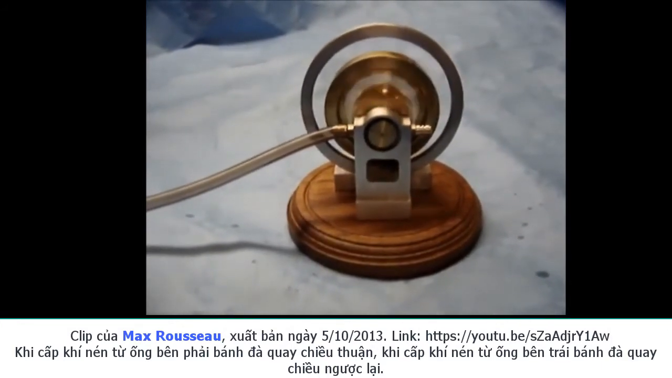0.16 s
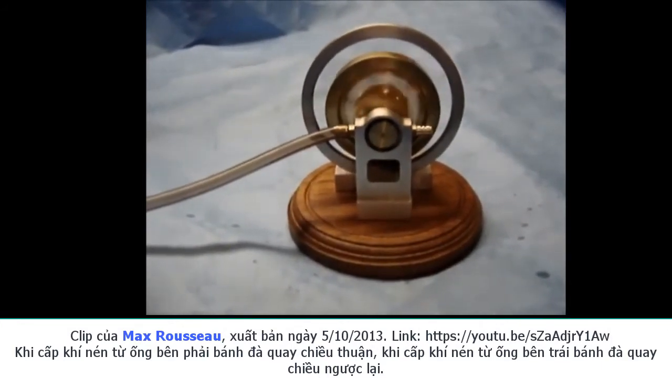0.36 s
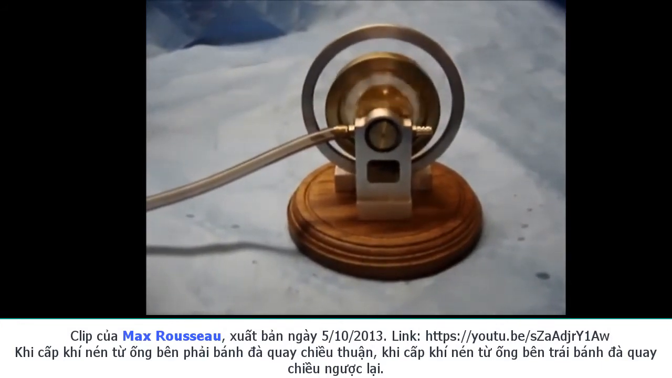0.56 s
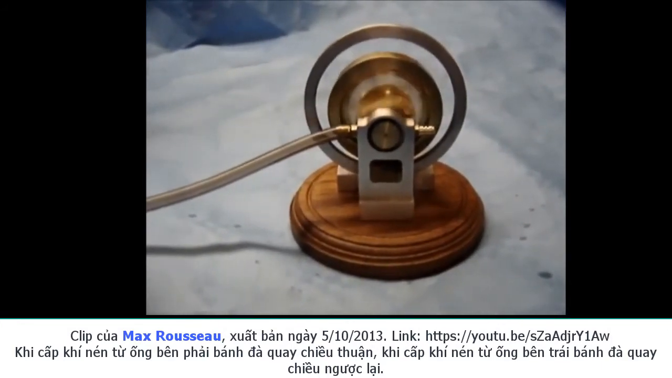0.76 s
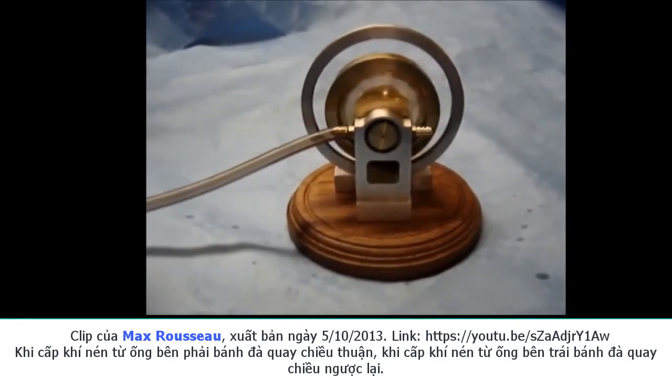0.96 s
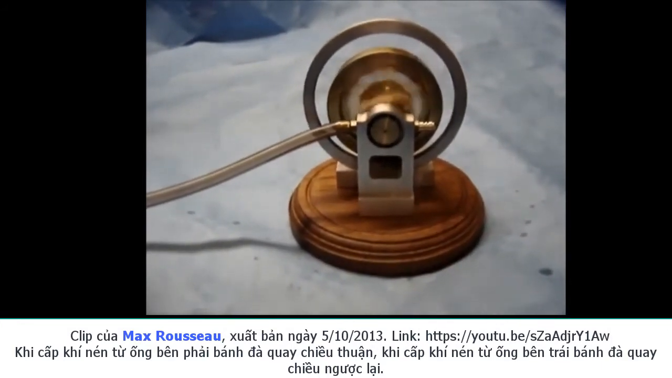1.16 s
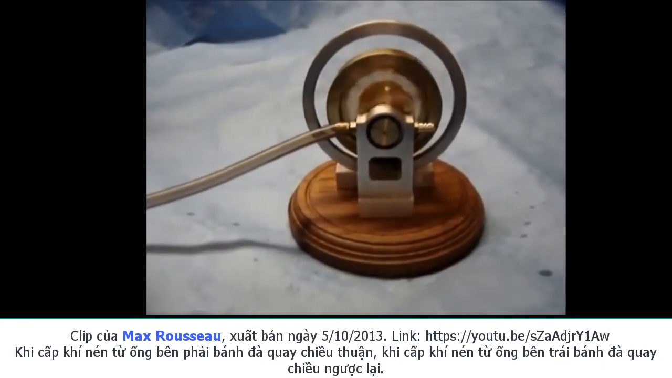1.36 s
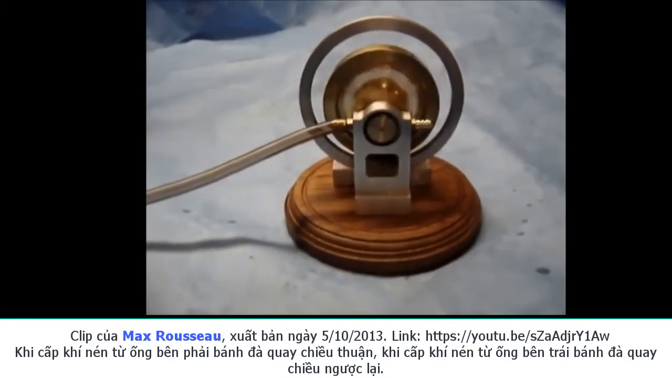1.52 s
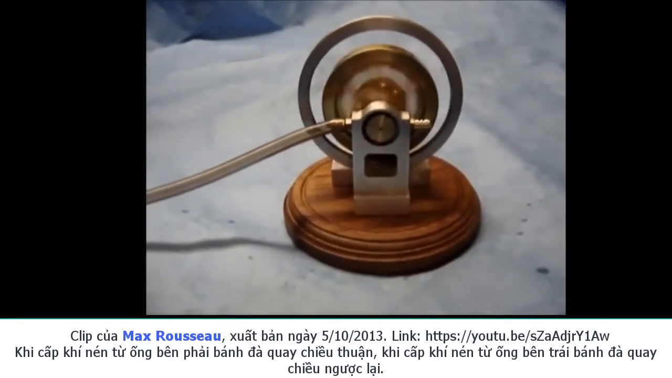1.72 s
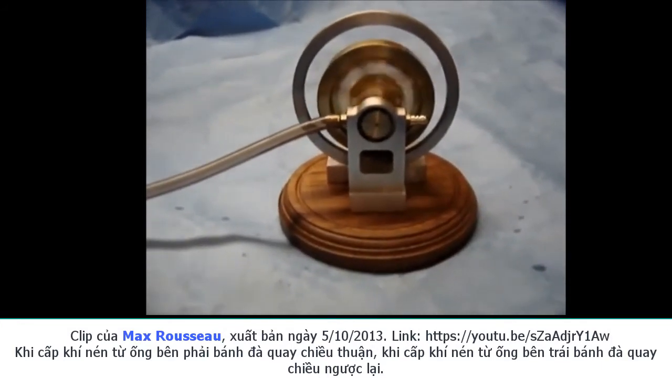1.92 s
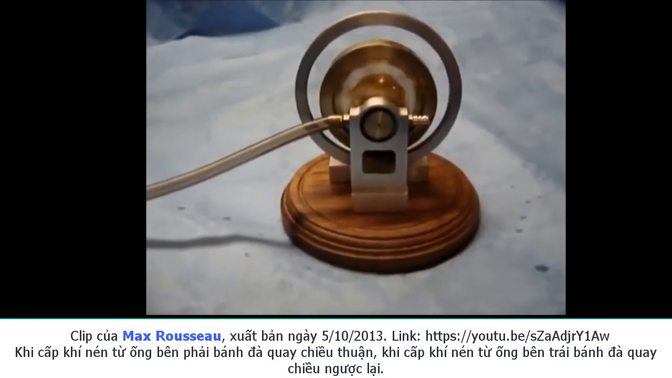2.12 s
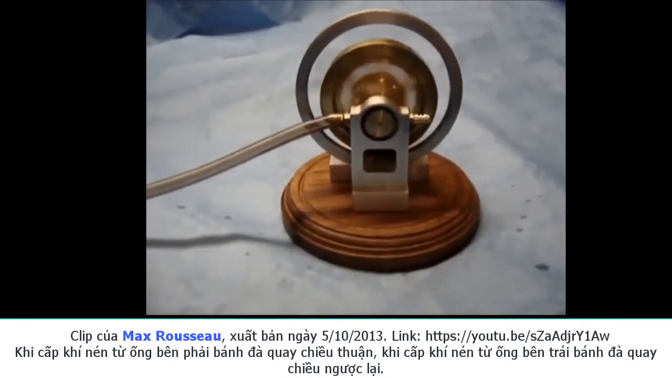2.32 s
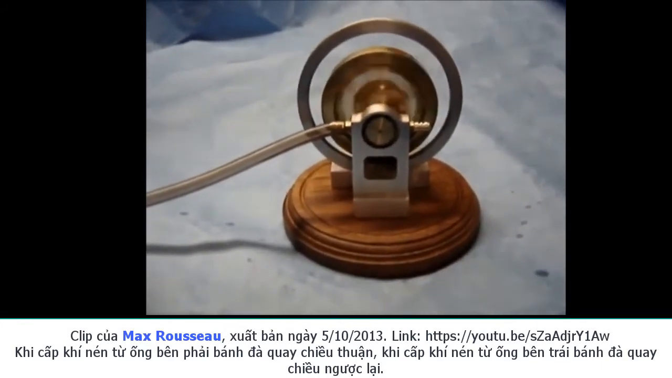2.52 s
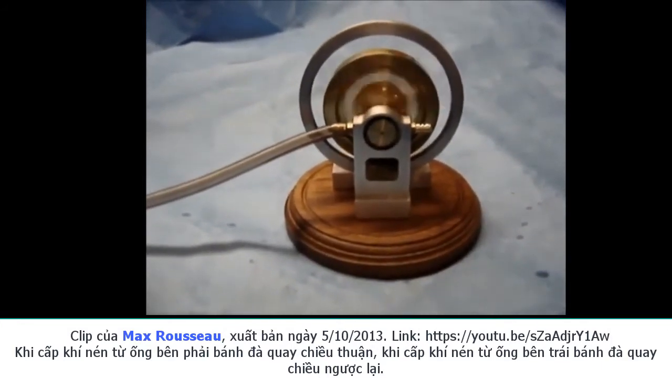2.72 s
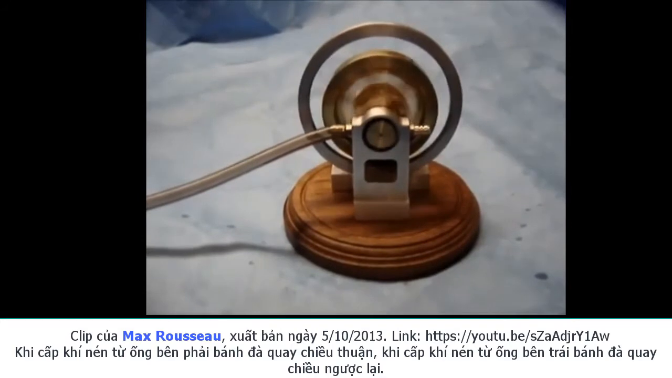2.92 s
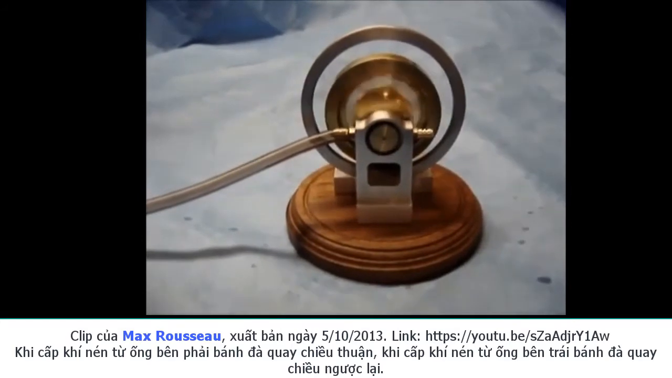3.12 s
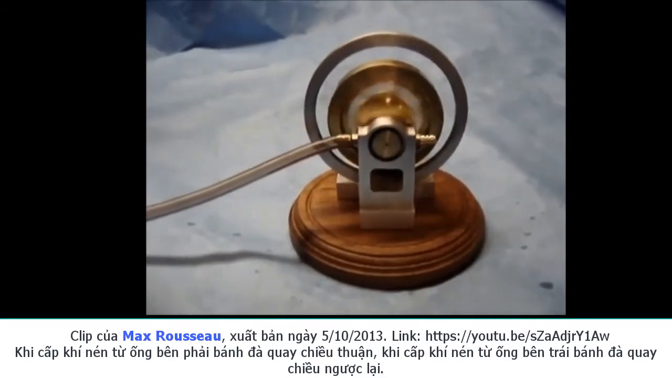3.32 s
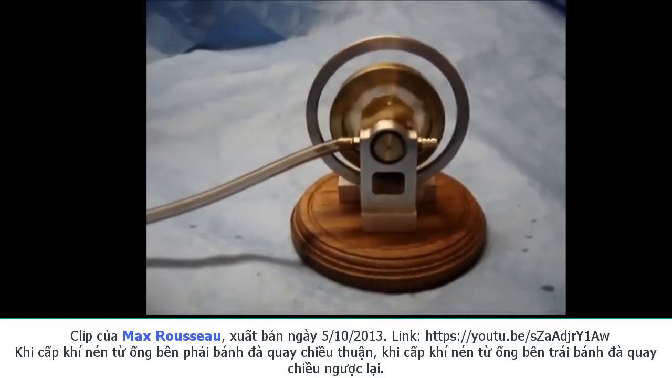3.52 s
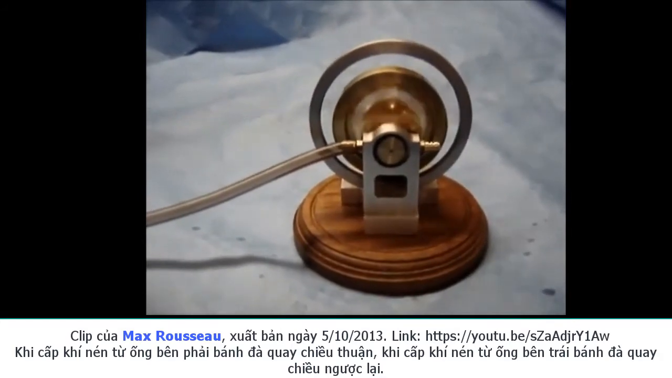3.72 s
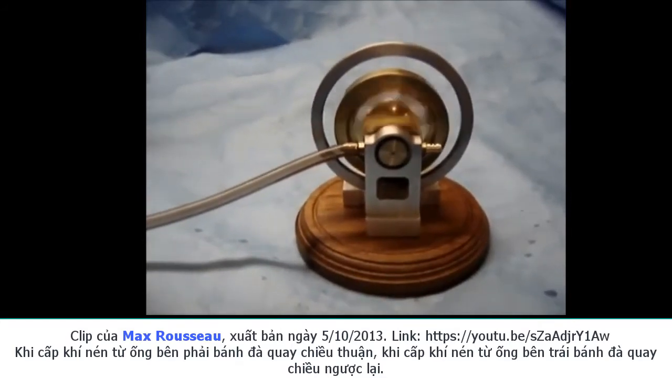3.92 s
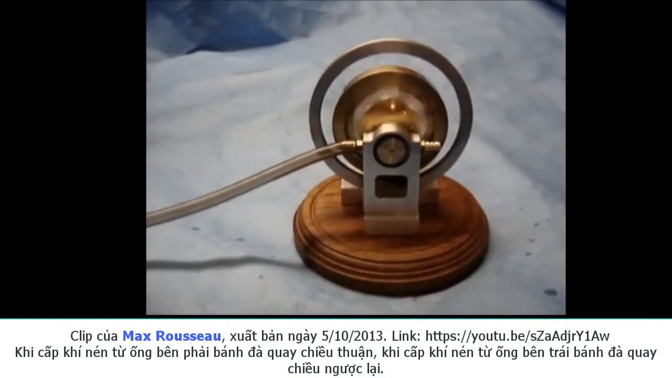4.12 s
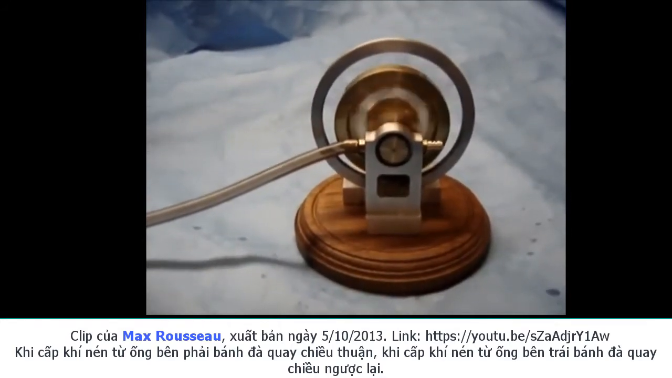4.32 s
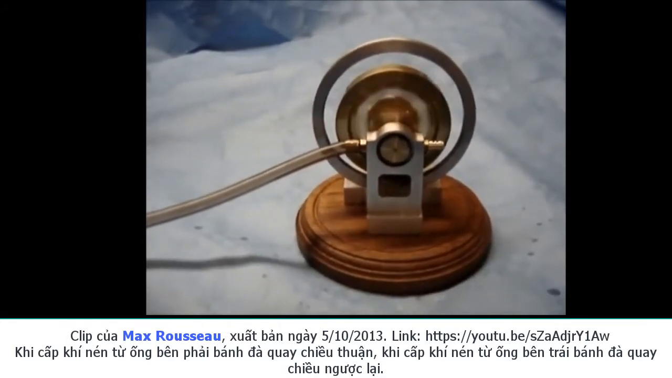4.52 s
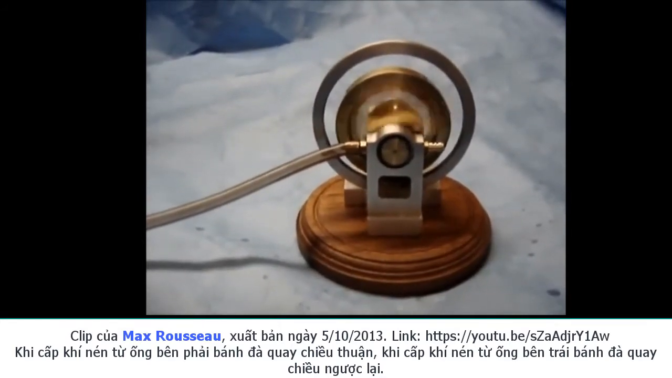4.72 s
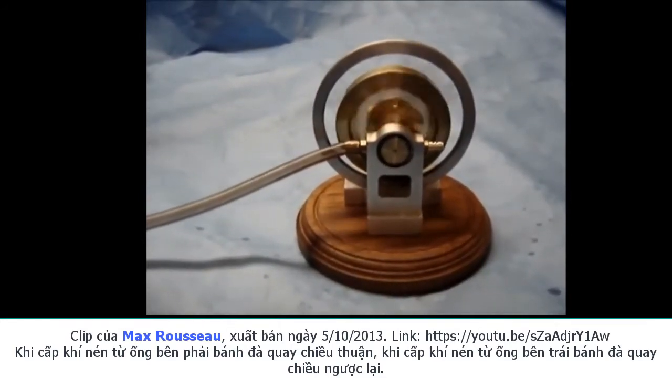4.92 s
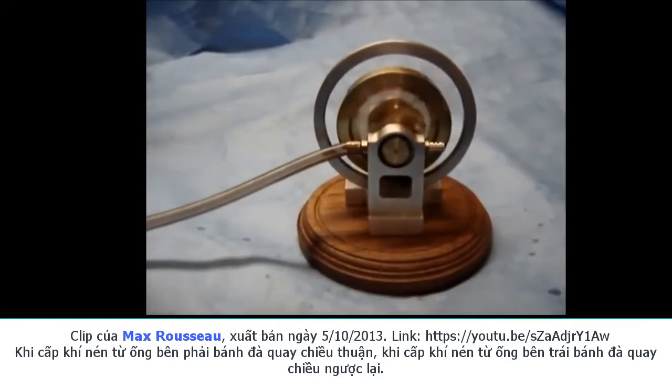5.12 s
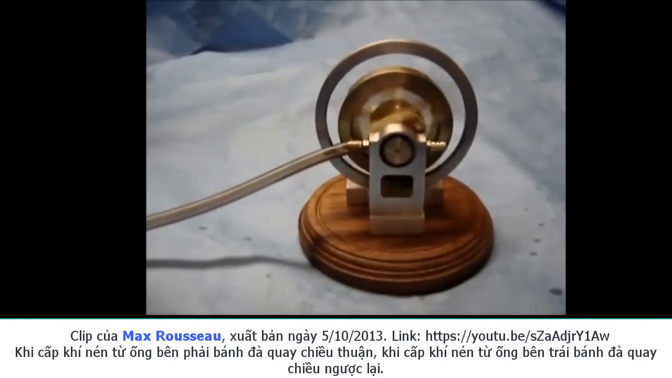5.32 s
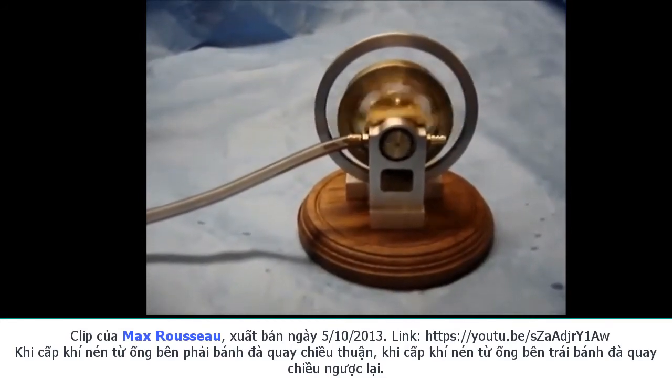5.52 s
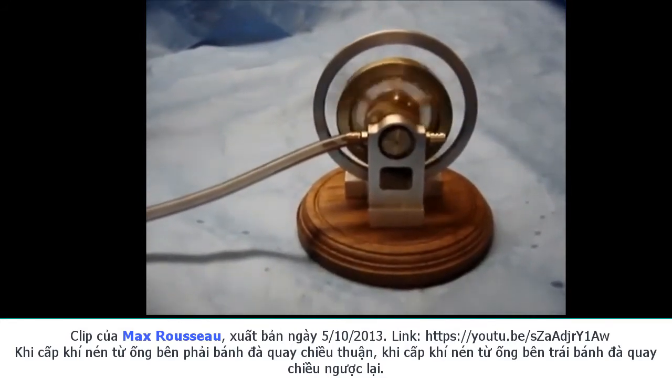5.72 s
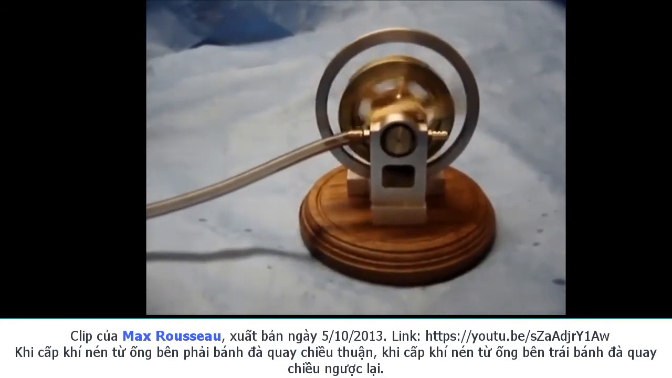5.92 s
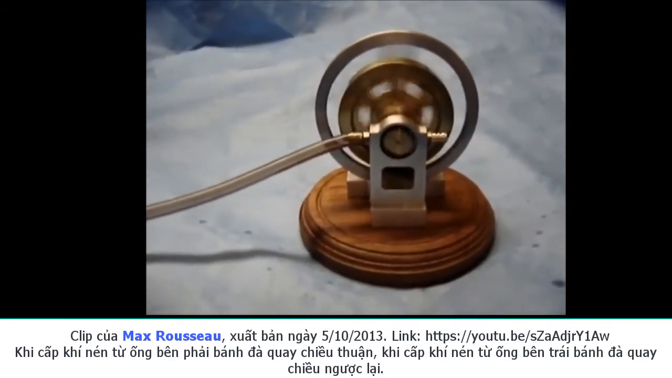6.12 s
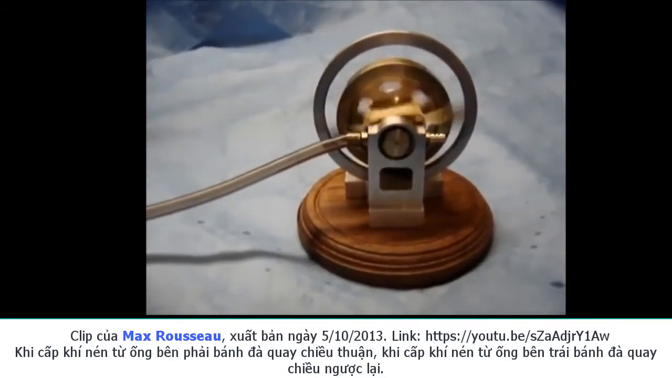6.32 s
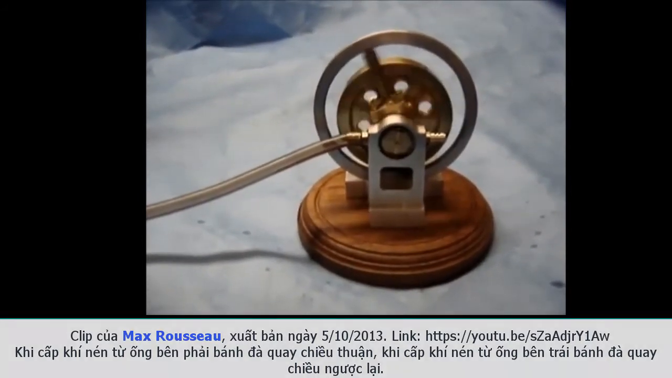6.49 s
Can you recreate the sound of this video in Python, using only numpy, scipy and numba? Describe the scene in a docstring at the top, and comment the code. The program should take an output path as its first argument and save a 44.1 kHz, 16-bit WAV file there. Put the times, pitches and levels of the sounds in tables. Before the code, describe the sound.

Fast, hissing exhaust beats and brassy chatter from a tiny air-driven engine hold steady, then wind down to slow, distinct clacking chuffs.

```python
"""Compressed-air brass engine slowing down

A small brass engine on a wooden base runs at speed, then slows to a creep as the air supply is turned down.
Twice a turn a port chops a noise jet into hiss; impulses at dead centre and along the turn ring the brass
parts as knocks and rattle. Multiples of the stroke rate through the base's resonances make the hum.
Dull handling bumps and room background lie beneath; a hand-held mono microphone is close by in a small room.
"""
import sys
import numpy as np
from scipy import signal
from scipy.fft import rfft, irfft
from scipy.io import wavfile
from numba import njit

SR = 44100
rng = np.random.default_rng(int(sys.argv[2]) if len(sys.argv) > 2 else 0)


def master(y):
    """Save y as 16-bit WAV."""
    cut = np.clip(np.atleast_2d(y).T, -1, 1)
    pcm = np.round(cut * 32767)  # scale
    wavfile.write(sys.argv[1], SR, pcm.astype(np.int16))


N = 293554
TIME = np.arange(N) / SR
FULL_RATE = 42  # full speed [strokes/s]; two strokes make a turn

# Dead-centre knocks slow enough to be heard singly:
# (time [s], relative level [dB], relative level of bright tick [dB], body resonance [Hz])
KNOCKS = [(4.6519, -3.5, -17.5, 1990), (4.7189, -5.5, -21, 2790), (4.789, -4, -10.5, 2850),
          (4.8601, -6.5, -16, 1850), (4.9325, -11.5, -7.5, 1850), (5.0095, -6, -17, 1840),
          (5.0889, -8, -13, 1850), (5.1706, -7.5, -13, 1770), (5.256, -3, -16.5, 2860),
          (5.3447, -6, -12.5, 1860), (5.437, -5, -15, 2710), (5.5362, -3.5, -16.5, 2780),
          (5.6405, -3, -15.5, 2580), (5.7519, -6.5, -11.5, 1660), (5.8724, -1, -14, 2820),
          (6.0051, -2.5, -16, 2800), (6.1544, -2.5, -15.5, 1990), (6.3284, -4, -16, 2860),
          (6.542, -2.5, -22, 2560)]


def undb(db):
    """Decibels to gain."""
    return 10 ** (np.asarray(db) / 20)


def level(x, db):
    """Scale to an rms level."""
    return x * undb(db) / np.sqrt(np.mean(x ** 2))


def noise(points):
    """Unit-rms noise shaped by (frequency [Hz], level [dB]) points."""
    hz, db = np.transpose(points)
    log_hz = np.log(np.maximum(np.fft.rfftfreq(N, 1 / SR), 1))
    gain = undb(np.interp(log_hz, np.log(hz), db))
    shaped = irfft(rfft(rng.standard_normal(N)) * gain, N)
    return level(shaped, 0)


@njit
def svf(x, hz, width):
    """State-variable band-pass with a moving centre, gain 1 there."""
    y, band_state, low_state = np.empty(len(x)), 0., 0.
    for i in range(len(x)):
        g, damping = np.tan(np.pi * hz[i] / SR), width / hz[i]
        v = (band_state + g * (x[i] - low_state)) / (1 + g * (g + damping))
        band_state = 2 * v - band_state
        low_state = low_state + 2 * g * v
        y[i] = damping * v
    return y


def band(x, hz, width_hz):
    """One resonance, fixed or moving."""
    return svf(x, hz * np.ones(N), float(width_hz))


def clicks(times, db):
    """Single impulses at the given times and levels."""
    inside = (times >= 0) & (times < (N - 1) / SR)
    samples = (times[inside] * SR).astype(int)
    return np.bincount(samples, undb(db[inside]), N)


def chatter(blows, decay_s):
    """Short, dying grind of the loose surfaces after each blow: noise under a decaying envelope."""
    keep = np.exp(-2 / (decay_s * SR))
    power = signal.lfilter([1 - keep], [1, -keep], blows ** 2)
    return np.sqrt(power) * rng.standard_normal(N)


def near(stroke, place, length):
    """Bell peaking once a turn at the given place; all in strokes."""
    distance = (stroke - place + 1) % 2 - 1
    return np.exp(-(distance / length) ** 2)


def wander():
    """Unit-rms random drift, mostly below 60 Hz."""
    return noise([(3, 0), (20, 0), (60, -40), (200, -90)])


def sets_in(speed, rate, order=10):
    """Level [dB] of a sound that fades out steeply below a speed [strokes/s]."""
    return -20 * np.log10(1 + (rate / speed) ** order)


def ports(stroke, speed, blur_power=1.12, edge_power=2.3):
    """Jet level [dB] over a turn: each port chokes the air, then lets out a puff."""
    # Ports, each shut just before a dead centre: (place in turn [strokes], closing time [strokes],
    # speed-dependent depth at creep [dB], constant depth term [dB], puff at full speed [dB])
    port_cycle = [(.83, 0.18, 31.5, -1, 2.5), (1.885, 0.12, 40, -3, 0)]
    creep_rate = 9  # strokes/s
    opening, advance = 0.064, 0.11  # strokes; quick opening, earlier action at full speed
    puff_delay, puff_length = 0.13, 0.07  # strokes
    db, pace = 0, speed / FULL_RATE
    for place, closing, slow_db, fast_db, puff_db in port_cycle:
        since = (stroke - place + advance * pace ** 2 + 1) % 2 - 1
        edge = np.where(since < 0, closing, opening)
        shut = np.exp(-np.abs(since / edge) ** edge_power)
        # under full pressure the air has no time to stop between strokes
        depth_db = fast_db + slow_db * (creep_rate / speed) ** blur_power
        puff = puff_db * pace * near(since, puff_delay, puff_length)
        db = db - shut * depth_db + puff
    return db


def exhaust(stroke, speed, flutter_db=2.48, leak_db=-48, return_side_db=0.07):
    """Air jet chopped by the ports, over a faint steady leak."""
    # Jet colour when slow: (frequency [Hz], level [dB])
    slow_colour = [(88, -54), (150, -14.5), (405, -17.5), (567, -1), (868, 1), (1280, 0), (1670, 4),
                   (2650, 3), (3110, 2.5), (3460, 1.5), (4940, 3.5), (9190, 0.5), (10400, -3.5),
                   (13500, -65), (22000, -120)]
    # Jet colour at full speed: (frequency [Hz], level [dB])
    fast_colour = [(150, -27), (400, -8.5), (900, -4.5), (1400, -2.5), (1900, 2), (2700, 3.5), (3600, -1),
                   (5000, 1.5), (7000, 5.5), (8200, -8), (9500, 3.5), (10400, -13)]
    slow_air_db, pressure_db, pressure_power = -27.5, 4.5, 4.2  # pressure falls much faster than speed
    pace = np.clip(speed / FULL_RATE, 0, 1)
    jet = pace * noise(fast_colour) + np.sqrt(1 - pace ** 2) * noise(slow_colour)
    # at speed the return stroke blows slightly harder than the outward one
    side_db = return_side_db * pace * np.sin(np.pi * stroke)
    air_db = slow_air_db + pressure_db * pace ** pressure_power - side_db
    flutter = noise([(2, 18), (20, 10.5), (100, 17.5), (400, -28)])
    leak = noise([(300, -9), (1200, 0), (3000, 2.0), (5500, -27), (10000, -33)])
    return jet * undb(air_db + ports(stroke, speed) + flutter_db * flutter) + undb(leak_db) * leak


def dead_centre(stroke, speed, lead_s=.001, return_lead_s=.0005, contact_s=.0011,
                slow_db=-1.5, body_db=-3, body_width_hz=900):
    """The slack crank knocks hard once a turn, and more softly on the way back."""
    knock_db, return_db, scatter_db = -5.5, -6.5, 1.2  # relative levels
    return_rate = 12.5  # strokes/s
    turns = np.arange(0, stroke[-1], 2)
    chance = rng.standard_normal((len(turns), 3)).T
    out = np.interp(turns, stroke, TIME) - lead_s
    back = np.interp(turns + 1, stroke, TIME, right=-1) - return_lead_s + 0.0005 * chance[2]
    times, db, _, body_hz = np.transpose(KNOCKS)
    running = out < times[0] - 1 / FULL_RATE  # turns before the singly listed knocks
    fast = clicks(out[running], knock_db + scatter_db * chance[0][running])
    slow = clicks(times + contact_s, db + slow_db)
    back_db = return_db + sets_in(np.interp(back, TIME, speed), return_rate)
    soft = clicks(back, back_db + scatter_db * chance[1])
    fast = undb(-1) * fast + undb(-6) * chatter(fast, .0018)
    slow = undb(-1) * slow + undb(-6) * chatter(slow, .0018)
    body = undb(body_db) * band(slow, np.interp(TIME, times, body_hz), body_width_hz)
    return fast + slow + body + undb(-14.0) * soft + undb(-8.0) * chatter(soft, 0.0057)


def rattle(stroke, speed, force_db=-3, ring_width_hz=750):
    """Rod and bearings touch at the same places of every turn; soft contacts ring in one narrow range."""
    # Linkage contacts: (place in turn [strokes], relative level [dB], resonance [Hz], hardness [0-1])
    touches = [(.02, 0, 1960, 0.02), (.16, -7, 1880, 0.3), (.47, -6.5, 2570, 0.68), (.55, -6, 1900, 0.25),
               (.885, 6, 2260, 0), (1.02, 1, 2120, 0.15), (1.162, -14, 2330, 0.1), (1.3, -8.5, 1890, 0.3),
               (1.471, -3, 2650, 0.34), (1.6, -1, 2600, 0.53)]
    # Looseness of the linkage: (time [s], relative level [dB])
    looseness = [(0, -1.5), (1.6, -1.5), (3.1, 0.5), (3.9, -2), (6.6, -4.5)]
    full_speed_db, db_per_octave, onset_rate = -3, 9.5, 13.5  # onset in strokes/s
    jitter_s, scatter_db = .00005, 1.1
    turns = np.arange(0, stroke[-1], 2)
    rattle_db = full_speed_db + db_per_octave * np.log2(speed / FULL_RATE) + sets_in(speed, onset_rate)
    rattle_db = rattle_db + np.interp(TIME, *np.transpose(looseness))
    out = 0
    for place, db, hz, hardness in touches:
        chance = rng.standard_normal((len(turns), 2)).T
        times = np.interp(turns + place, stroke, TIME, right=-1) + jitter_s * chance[0]
        touch_db = force_db + db + np.interp(times, TIME, rattle_db) + scatter_db * chance[1]
        touch = clicks(times, touch_db)
        touch = touch + undb(-7) * chatter(touch, .0016)
        share = np.clip(hardness, 0, 1)
        out = out + share * touch + (1 - share) * band(touch, hz, ring_width_hz)
    return out


def linkage(stroke, speed, knock_db=22, tick_drift=0.0083):
    """Knocks and rattle ring the same brass parts; the bright tick drifts in pitch, and grows with speed."""
    # Ringing of frame and cylinder: (frequency [Hz], width [Hz], level [dB])
    frame_modes = [(283, 390, -13.5), (540, 125, -13), (918, 58, -13), (1342, 107, -9), (1793, 246, -4),
                   (2050, 101, -4), (2510, 180, -6.5), (2785, 340, -5), (4150, 190, -7), (9880, 200, -8.5)]
    tick_hz, tick_width_hz, tick_base_db = 5890, 440, 17
    blows = dead_centre(stroke, speed) + rattle(stroke, speed)
    frame = sum(undb(db) * band(blows, hz, width) for hz, width, db in frame_modes)
    times, _, bright_db, _ = np.transpose(KNOCKS)
    tick = band(blows, tick_hz * (1 + tick_drift * wander()), tick_width_hz)
    tick_db = tick_base_db + np.interp(TIME, times, bright_db) + 3.2 * (speed / FULL_RATE) ** 2
    return undb(knock_db) * (frame + undb(tick_db) * tick)


def room(x, t60_s=0.43, wet_db=-14, dull_hz=3200):
    """Table top and near walls add a short, duller tail: convolution with decaying low-passed noise."""
    t = TIME[:SR // 3]
    tail = rng.standard_normal(len(t)) * undb(-60 * t / t60_s) * (t > .003)
    tail = signal.sosfilt(signal.butter(2, dull_hz, fs=SR, output="sos"), tail)
    tail = tail / np.linalg.norm(tail)
    return x + undb(wet_db) * signal.fftconvolve(x, tail)[:N] * np.sqrt(2 * dull_hz / SR)


def hollow(hiss, stroke, speed, notch_hz=6150, notch_width_hz=1800):
    """A notch in the treble opens in mid-stroke, a little different each time, and shallower when slow."""
    # Treble hollows: (place in turn [strokes], length [strokes], relative depth [0-1])
    hollow_cycle = [(.45, 0.31, 0.92), (1.35, 0.17, 0.85)]
    drift_hz, unevenness = 300, .15
    hz = notch_hz + drift_hz * wander()
    depth = sum(share * near(stroke, place, length) for place, length, share in hollow_cycle)
    depth = depth * np.interp(speed, [9, 18], [.15, 1])
    depth = np.clip(depth * (1 + unevenness * wander()), 0, 1)
    for _ in range(2):
        hiss = hiss - depth * band(hiss, hz, notch_width_hz)
    return hiss


def base_hum(stroke, speed, lead=0.068, waver_db=0.5):
    """The piston shoves the base once a stroke; each multiple swells as it slides through a resonance."""
    # Radiation of base and table: (frequency [Hz], level [dB])
    base_response = [(33, -25), (42, -12.5), (58, -8.5), (84, 0.5), (111, -3), (135, -1), (168, 2.5),
                     (190, 8.5), (201, 6), (212, -10), (228, -9), (255, 1), (292, -0.5), (370, -7),
                     (420, 1.5), (490, -3), (560, -0.5), (620, -16)]
    # Shove strength at successive multiples of the stroke rate: (relative level [dB])
    shove_db = [-1, 1, -19, 1.5, 1.5, -5.5, -1, -1, -1.5, -2.5, -2, -7.5, -3, -10]
    full_speed_db, db_per_octave = -48, 11.5
    hz, db = np.transpose(base_response)
    hum = 0
    for k, shape_db in enumerate(shove_db, 1):
        gain = undb(np.interp(k * speed, hz, db) + shape_db)
        hum = hum - gain * np.cos(2 * np.pi * k * (stroke + lead))
    hum_db = full_speed_db + db_per_octave * np.log2(speed / FULL_RATE)
    waver = noise([(6, -15), (25, -12), (90, -85)])
    return np.sqrt(2) * hum * undb(hum_db + waver_db * waver)


def room_tone(tone_db=-50.5):
    """Steady room background of shaped noise."""
    # Background colour: (frequency [Hz], level [dB])
    tone_colour = [(25, -20), (45, -5), (80, -3), (160, -14), (400, -6), (1500, -19), (4000, -16.5),
                   (10000, -43)]
    return undb(tone_db) * noise(tone_colour)


def handling(width_s=0.022, bump_db=-3):
    """Dull swells of rumble as the hand shifts on the microphone."""
    # Handling bumps: (time [s], relative level [dB])
    bump_times = [(1.736, -36), (2.926, -31.5), (3.486, -32.5), (4.026, -34), (4.926, -38), (5.924, -42),
                  (6.056, -48), (6.326, -35)]
    swell = sum(undb(db) * np.exp(-((TIME - s) / width_s) ** 2) for s, db in bump_times)
    rumble = noise([(25, -11), (55, -7), (170, -5.5), (260, -5.0), (600, -43), (2000, -95)])
    return undb(bump_db) * swell * rumble


def port_ring(stroke, speed, ring_hz=2800, width_hz=450, ring_db=-29, place=0.706, length=0.11):
    """At middling speeds the air rings briefly in the narrowing port: twice band-passed noise."""
    ring = band(rng.standard_normal(N), ring_hz, width_hz)
    ring = band(ring, ring_hz, width_hz)
    middling = np.interp(speed, [10, 15, 26, 36], [0, 1, 1, 0])
    return level(ring, ring_db) * near(stroke, place, length) * middling


def scene():
    """The flywheel's speed drives air, knocks and hum together."""
    # Flywheel speed: (time [s], rate [strokes/s])
    speed_curve = [(0.0, 42.088), (0.712, 41.901), (1.723, 41.943), (3.193, 40.939), (3.698, 38.486),
                   (4.446, 32.417), (6.66, 6.738)]
    start_stroke = -.257
    speed = np.interp(TIME, *np.transpose(speed_curve))
    stroke = start_stroke + np.cumsum(speed) / SR
    engine = exhaust(stroke, speed) + linkage(stroke, speed) + port_ring(stroke, speed)
    engine = hollow(room(engine), stroke, speed)
    mono = engine + base_hum(stroke, speed) + room_tone() + handling()
    return np.array([mono, mono])


def record(dry, ceiling=.85, top_hz=10450):
    """The microphone chain rounds the loudest peaks and cuts the top steeply."""
    rounded = ceiling * np.tanh(dry / ceiling)
    return signal.sosfilt(signal.ellip(12, .2, 75, top_hz, fs=SR, output="sos"), rounded)


dry = scene()
out = record(dry)
master(out)
```